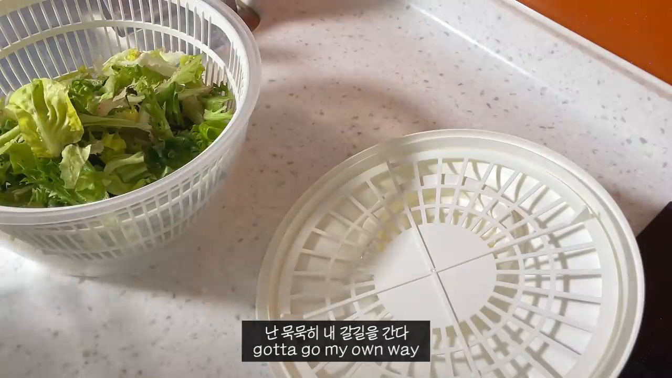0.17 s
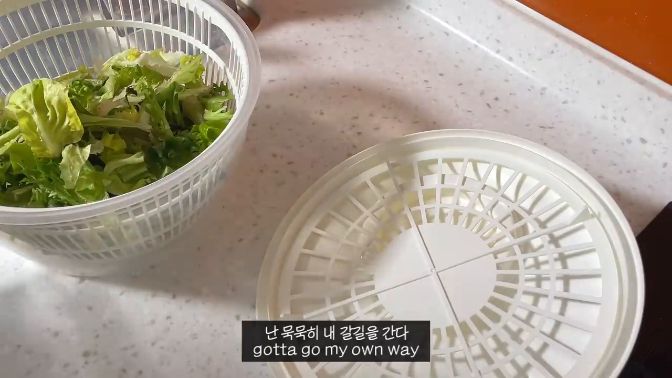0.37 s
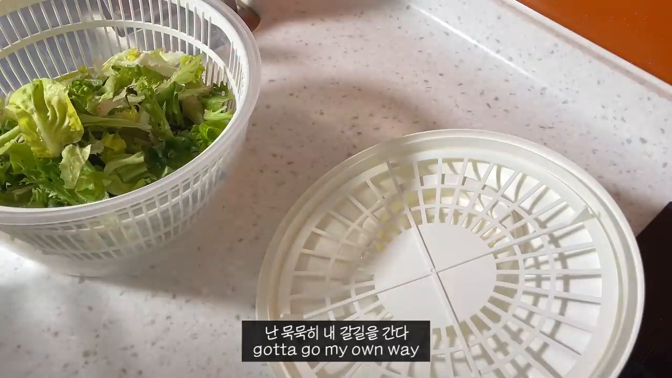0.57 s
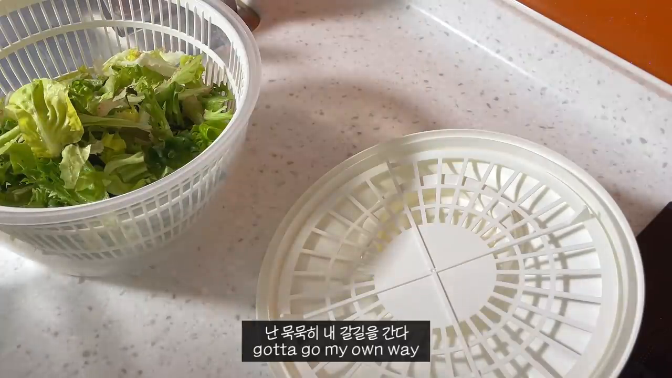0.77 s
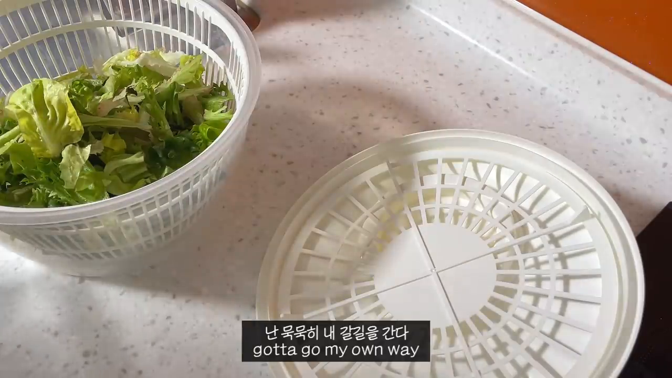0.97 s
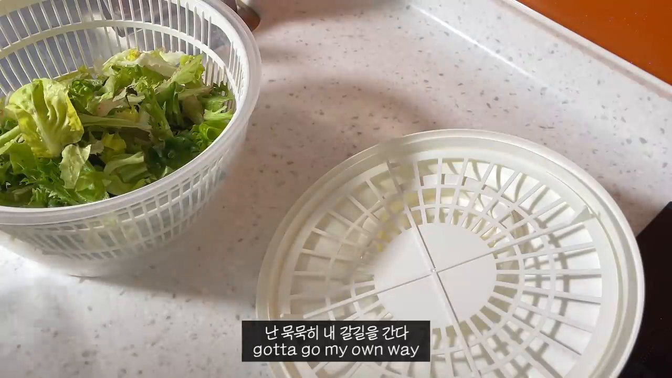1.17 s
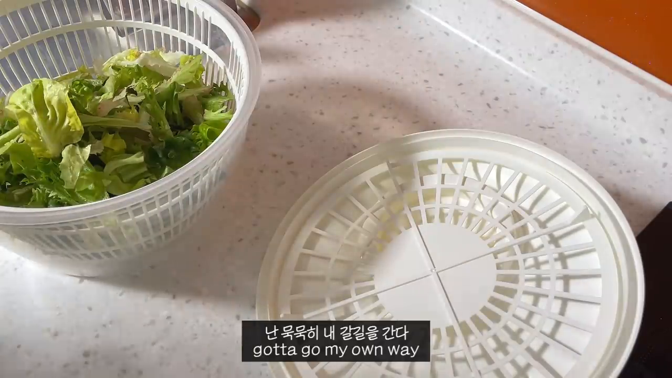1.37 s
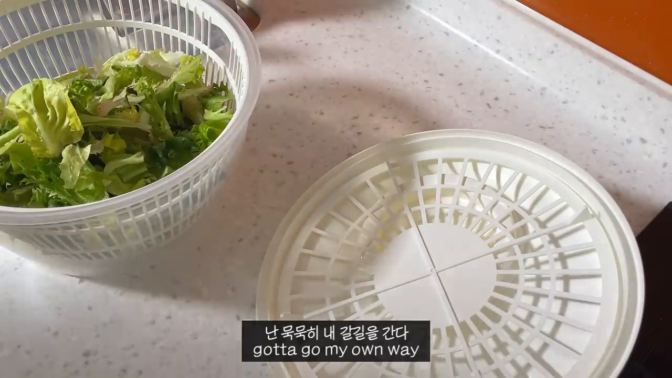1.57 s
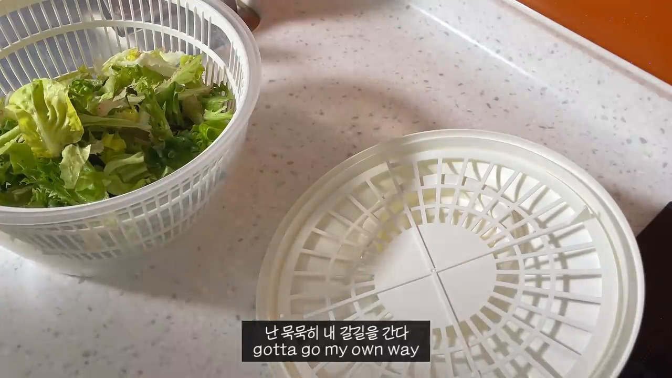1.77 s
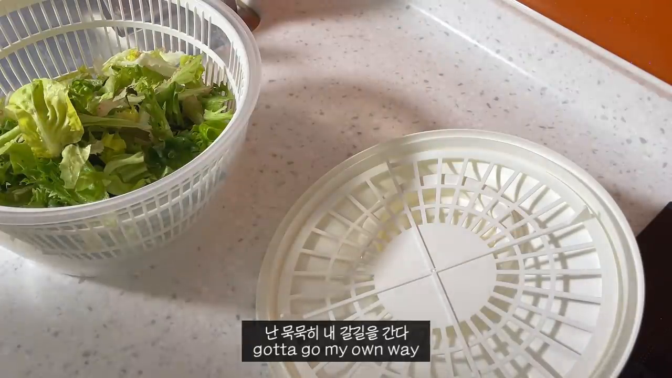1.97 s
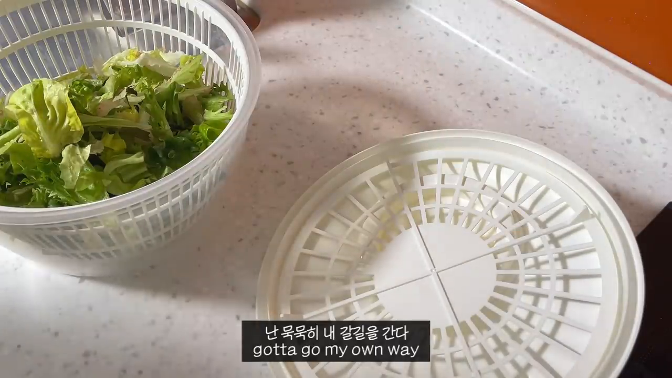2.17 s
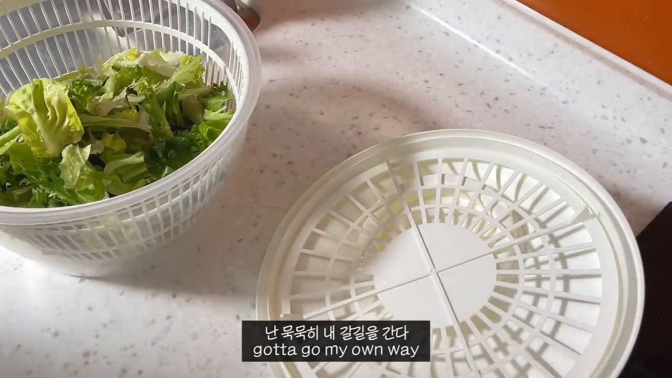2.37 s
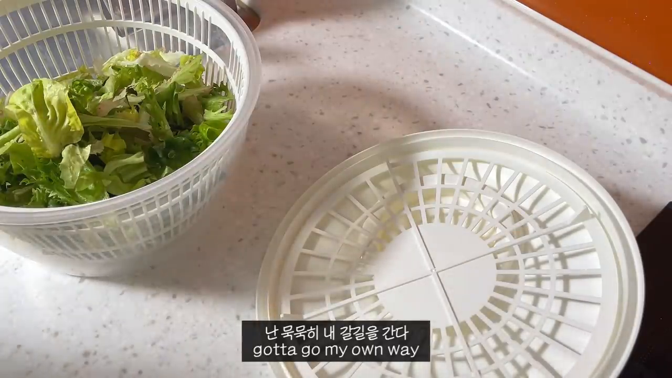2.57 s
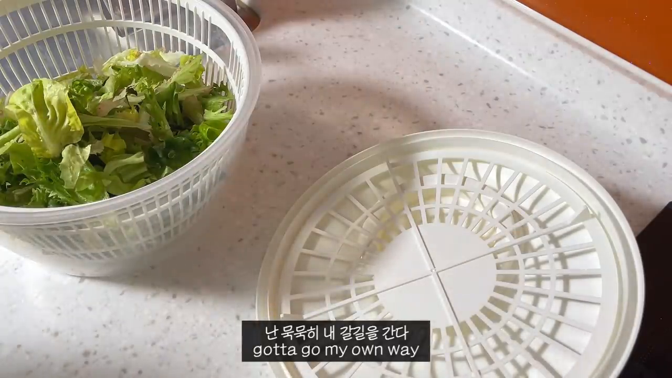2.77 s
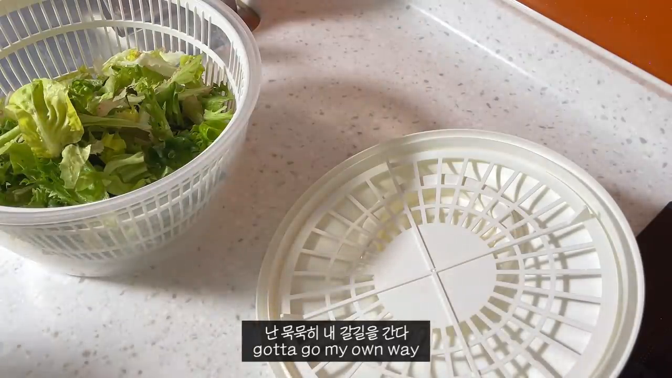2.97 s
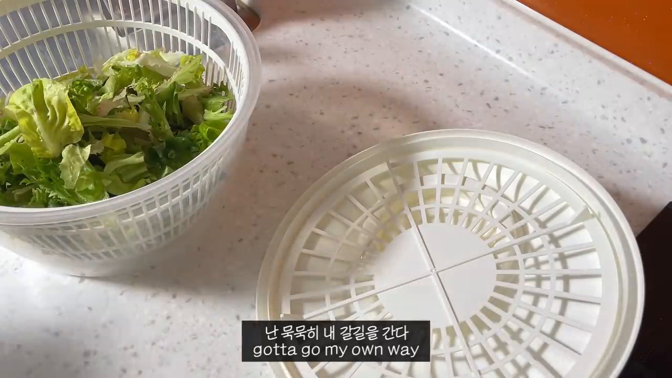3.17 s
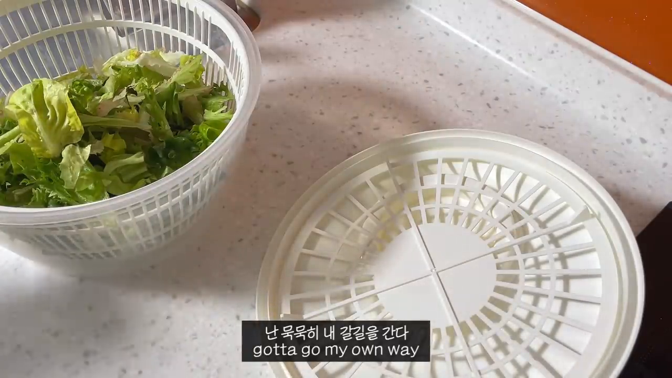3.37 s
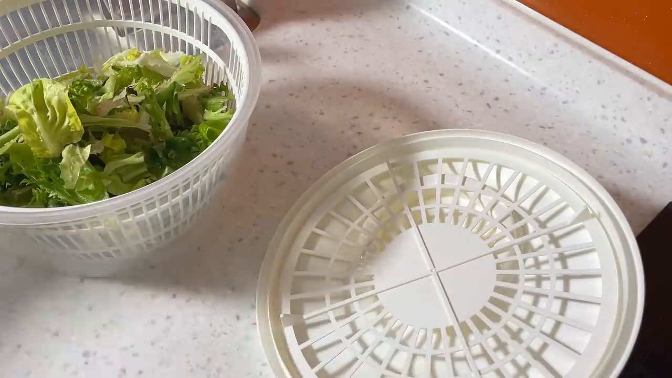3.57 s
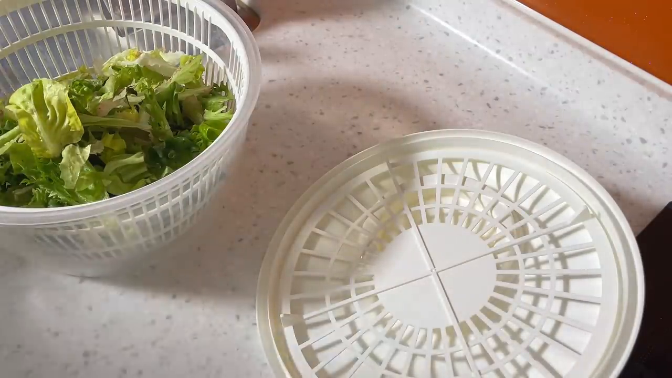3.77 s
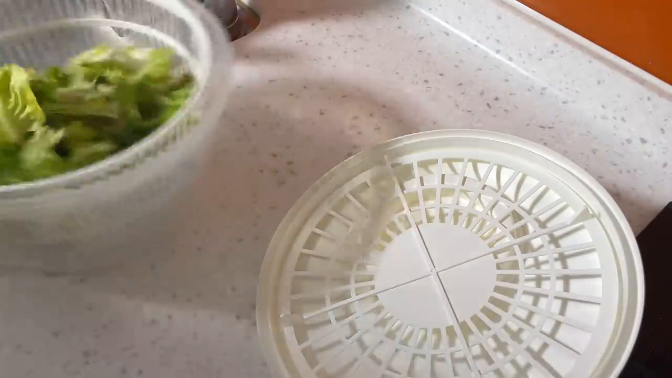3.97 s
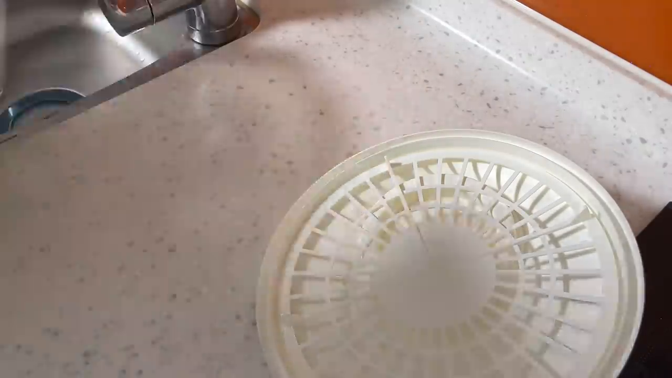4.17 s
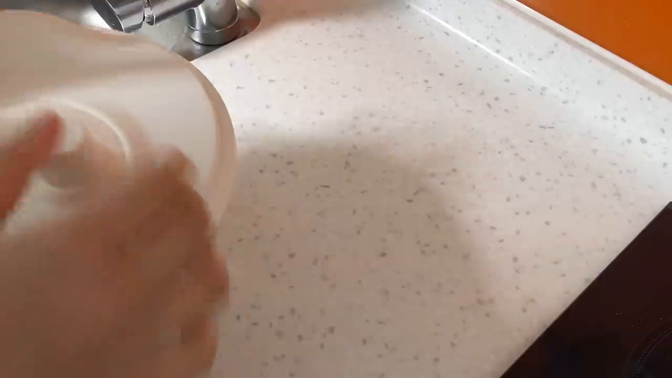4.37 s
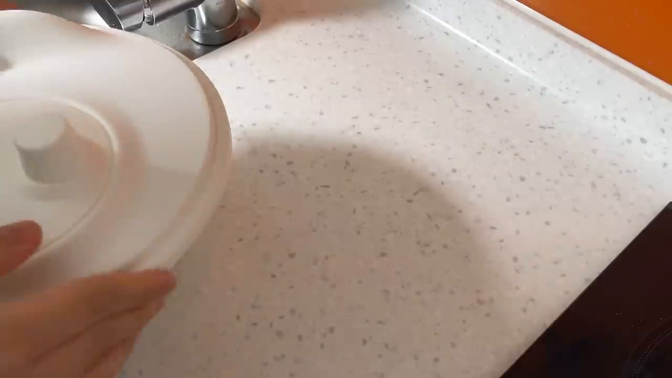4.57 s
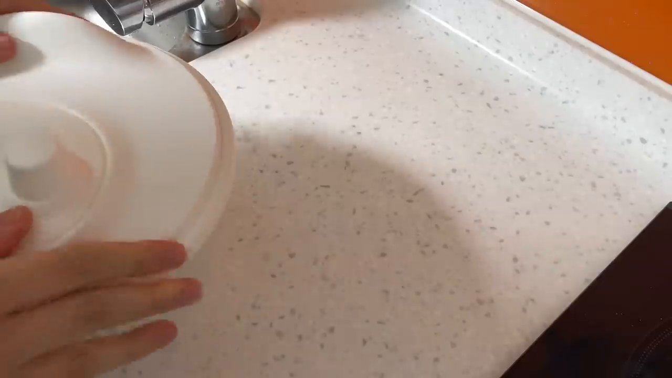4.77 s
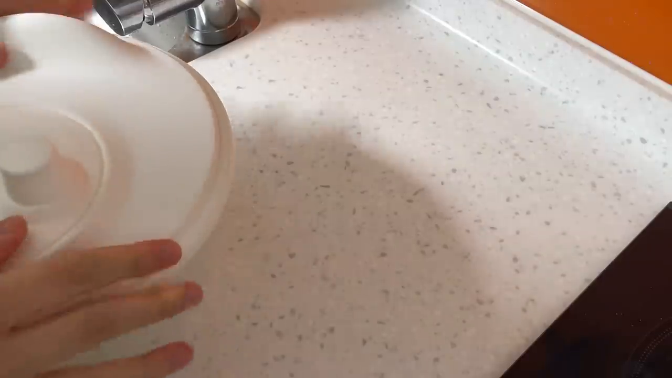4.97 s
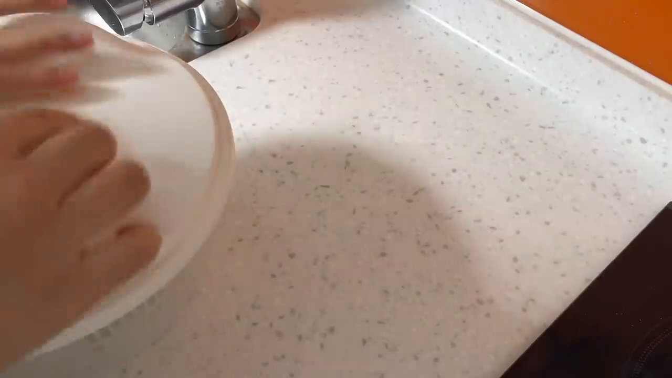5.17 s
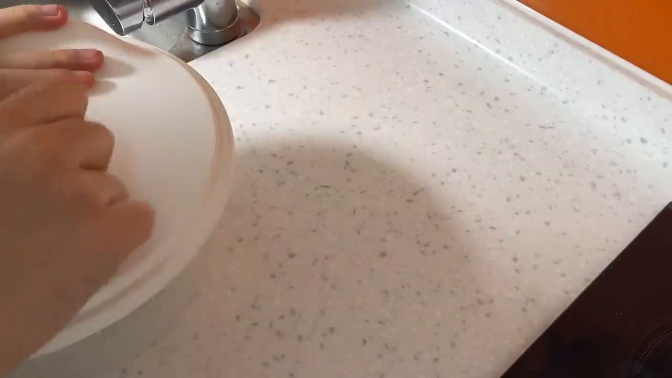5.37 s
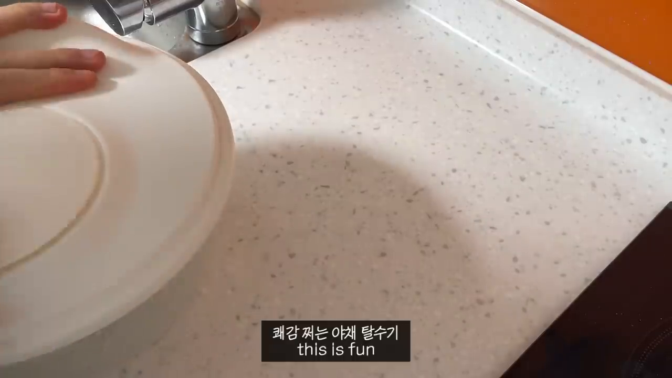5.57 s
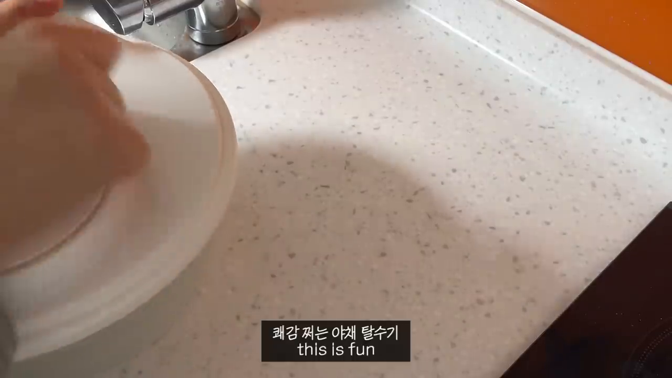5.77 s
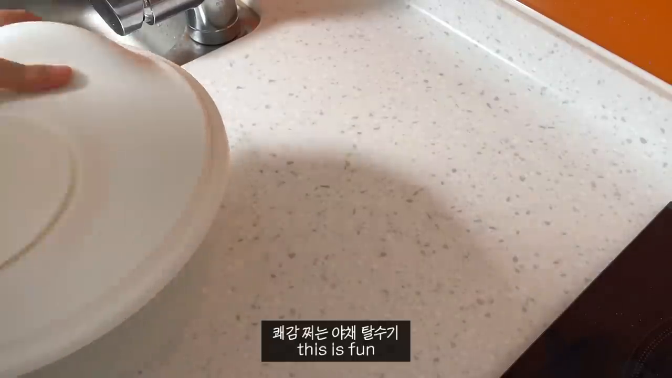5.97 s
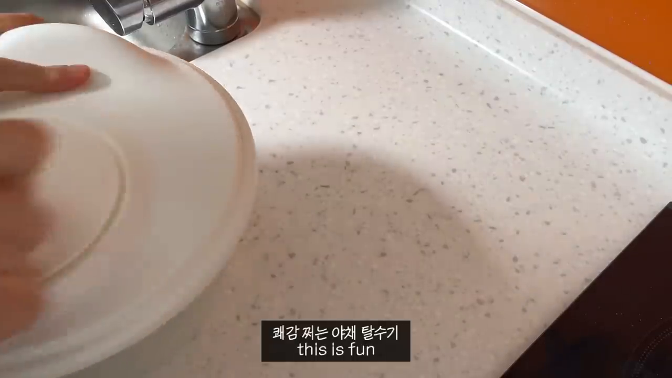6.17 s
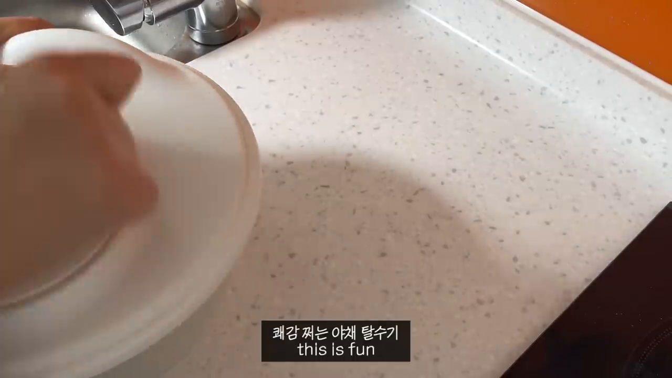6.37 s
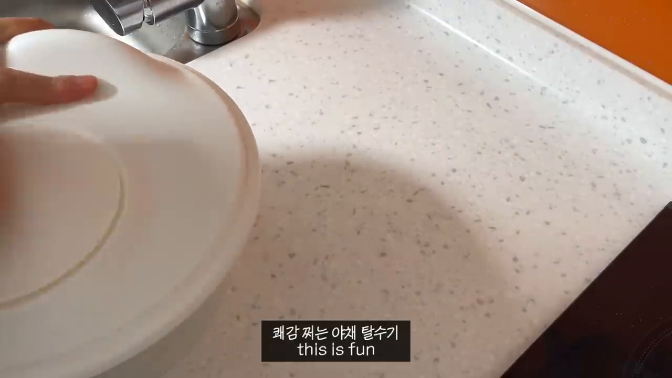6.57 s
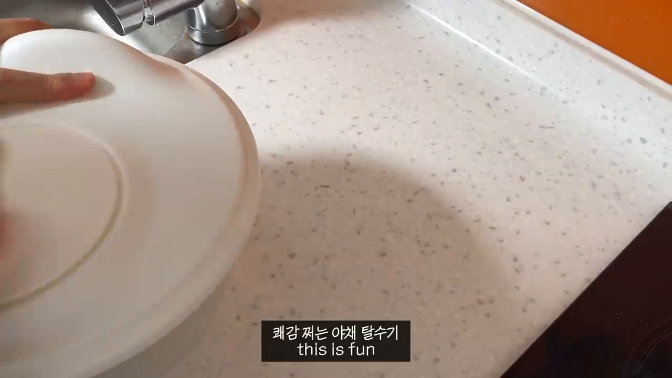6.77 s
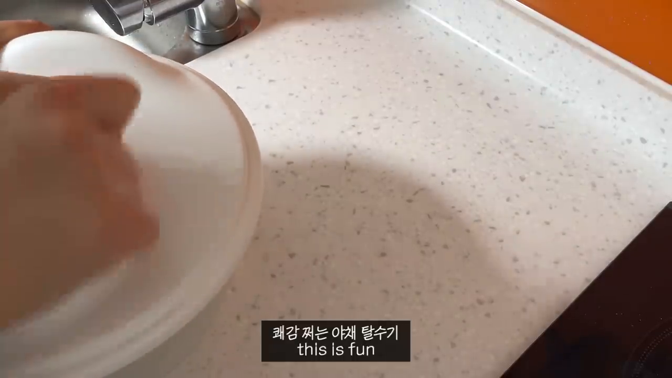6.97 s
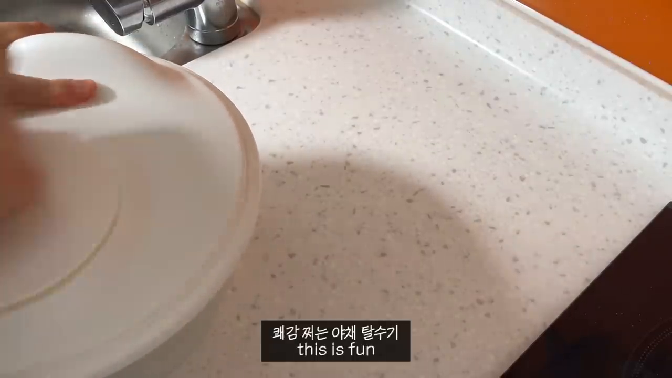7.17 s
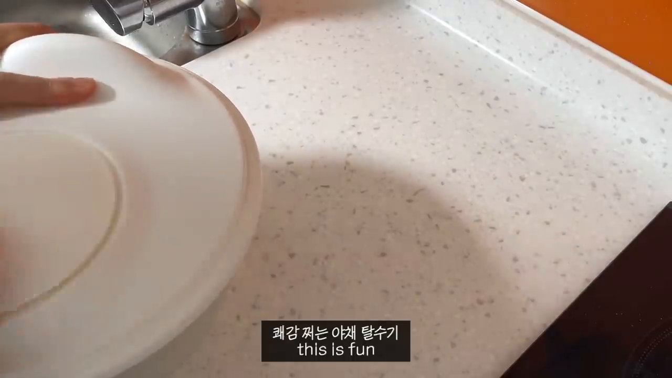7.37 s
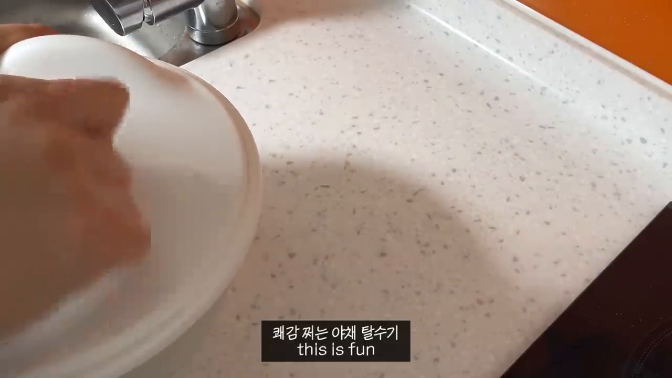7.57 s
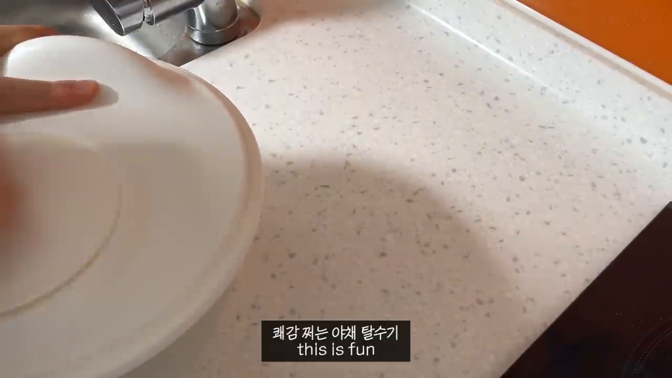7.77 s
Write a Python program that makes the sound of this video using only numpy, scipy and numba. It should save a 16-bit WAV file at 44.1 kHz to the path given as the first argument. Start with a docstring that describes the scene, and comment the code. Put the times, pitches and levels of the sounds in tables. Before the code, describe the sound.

Close up in a quiet home kitchen, light plastic bowl, basket and lid knock hollowly on a stone counter, with faint rustling, dull drags and one tiny squeak. After a sparse stretch, a cluster of lid clatters leads to hand cranking: a low rumbling start, then fast gear clicks and grinding that swell with each push, with quick hollow clacks per basket lap until the end. Short diffuse room tail, low soft air.

```python
"""Plastic salad spinner on a stone countertop in a quiet kitchen, close to a two-port microphone.
Knocks as bowl, basket and lid are set down: bowl modes, cracking wall noise, counter thuds.
Among them, shuffles of filtered grains and a short squeak of two gliding partials.
Then a hand cranks: clicks per gear tooth ring the lid, with grinding, rumble and a clack per lap.
Behind all: a diffuse room tail and low, wavering air noise."""
import sys
import numpy as np
from scipy import signal
from scipy.fft import rfft, irfft
from scipy.io import wavfile
from scipy.ndimage import uniform_filter1d
from numba import njit

SR = 44100
rng = np.random.default_rng(int(sys.argv[2]) if len(sys.argv) > 2 else 0)


def waveform_to_disk(signal):
    """Save audio, clipped to [-1, 1], as 16-bit WAV at the path in sys.argv[1]."""
    frames = np.transpose(np.atleast_2d(signal))
    scaled = np.clip(frames, -1, 1) * 32767
    samples = np.round(scaled).astype(np.int16)
    wavfile.write(sys.argv[1], SR, samples)


N = 348390
T = np.arange(N) / SR

# knocks of bowl, basket and lid:
# [t/s, blow gain/dB, strongest ring/Hz, thud gain/dB, crack gain/dB, chatter length/s]
KNOCK_EVENTS = [(0.068, -38.5, 700, -6, -19, .004), (0.151, -20.5, 474, -8, -5, 0.011),
                (0.218, -27.5, 487, -1.5, -9, 0.0051), (0.234, -25.5, 555, -12, -10, 0.0054),
                (0.269, -28, 460, -5, -9, .006), (0.351, -36, 550, -13, -13.5, 0.0058),
                (0.509, -15.5, 440, -12, -13, 0.008), (0.557, -29.5, 500, -5, -7.5, 0.0054),
                (0.682, -35.5, 417, -20, -17, 0.0068), (0.785, -33, 423, -16.5, -29, .006),
                (0.834, -9.5, 577, -18.5, -13, 0.013), (1.036, -16, 570, -23, -46, 0.0098),
                (1.118, -16.5, 634, -13, -43, 0.008), (1.431, -18, 397, -7, -45, 0.026),
                (1.8239, -8, 696, -16, -1, 0.011), (2.527, -39.5, 497, -15.5, -5.5, 0.0064),
                (2.983, -14, 517, -11, -19.5, 0.071), (3.154, -17.5, 525, -10.5, -16, 0.044),
                (3.858, -33, 689, -5, 3.5, 0.012), (4.231, -38.5, 340, -0.5, -13.5, 0.022),
                (4.311, -24, 2000, -15, -9, 0.0032), (4.343, -21.5, 510, -7, -11.5, 0.014),
                (4.371, -31.5, 500, 0, -10, .01), (4.482, -22, 520, -6, -5, 0.0093),
                (4.724, -13.5, 490, -12, -13.5, 0.0041), (4.744, -29, 1400, 1, -4.5, 0.0049),
                (4.762, -22.5, 1500, -6, -9.5, 0.0095), (4.776, -18.5, 580, -1.5, -1, 0.0094),
                (4.787, -17, 604, -5, -32, .03), (4.966, -35.5, 530, -8.5, -10.5, 0.0099),
                (5.162, -29, 790, -8.5, -16.5, 0.018), (5.26, -28.5, 900, -8, -6, 0.005),
                (5.305, -29, 775, -20, -29, .008), (6.046, -27, 343, 4.5, -24, 0.014)]
# rubbing of plastic and leaves: [t/s, length/s, strongest rustle gain/dB, drag over rustle/dB]
SHUFFLE_EVENTS = [(0, 0.14, -56, 12.5), (0.392, 0.13, -43, -1.5), (0.699, 0.12, -50, 9),
                  (1.055, 0.28, -55.5, 17), (1.311, 0.095, -49, 12), (1.431, 0.21, -61, 13),
                  (1.557, 0.12, -54.5, 14), (3.864, 0.17, -55.5, 1.5), (4.041, 0.043, -55, 3.5),
                  (4.256, 0.057, -30, -3.5), (4.454, 0.021, -49, 16), (4.573, 0.15, -45, 8),
                  (5.195, 0.14, -54.5, 18.5)]
# the hand pushes the handle once a turn and loads the gear: [t/s, length/s, load at start/dB, swell/dB]
HAND_PUSHES = [(5.36, 0.12, -48, 12), (5.486, 0.087, -33, -3), (5.816, 0.13, -32.5, 4.5),
               (6.055, 0.2, -31.5, 2.5), (6.36, .14, -33.5, 9), (6.681, 0.12, -28, -2.5),
               (6.985, 0.12, -27.5, -5), (7.292, 0.09, -27.5, -5), (7.565, 0.14, -30, 1.5)]


def undb(db):
    """Decibels to gain."""
    return 10 ** (np.asarray(db) / 20)


def unit(x):
    """Scale to rms 1."""
    return x / np.sqrt(np.mean(x ** 2))


def colour(x, table):
    """Filter by an [f/Hz, level/dB] table, with a causal response from the cepstrum."""
    hz, db = np.transpose(table)
    grid_hz = np.linspace(1, SR / 2, 2049)
    cepstrum = irfft(np.interp(np.log(grid_hz), np.log(hz), db) * np.log(10) / 20)
    # fold onto positive time: minimum phase
    cepstrum[1:2048] *= 2
    cepstrum[2049:] = 0
    return signal.fftconvolve(x, irfft(np.exp(rfft(cepstrum))))[:len(x)]


@njit
def svf(x, hz, width):
    """State-variable band-pass whose centre may move, gain 1 at the centre."""
    y, band, low = np.empty(len(x)), 0., 0.
    for i in range(len(x)):
        g, k = np.tan(np.pi * hz[i] / SR), width / hz[i]
        v = (band + g * (x[i] + 1e-18 - low)) / (1 + g * (g + k))
        band, low, y[i] = 2 * v - band, low + 2 * g * v, k * v
    return y


def resonate(x, table):
    """Sum of fixed [f/Hz, width/Hz, level/dB] resonances."""
    return sum(undb(db) * svf(x, np.full(N, float(hz)), float(width)) for hz, width, db in table)


def walk(rate_hz):
    """Random levels held 1 / rate_hz and slewed; spread near 1."""
    hold = int(SR / rate_hz)
    steps = np.repeat(rng.standard_normal(N // hold + 1), hold)
    return 2 ** .5 * uniform_filter1d(steps, hold)[:N]


def grains(per_s, spread_db):
    """Scattered clicks, a few much larger than the rest, over a bed of noise."""
    hit = rng.random(N) < per_s / SR
    clicks = hit * rng.standard_normal(N) * undb(spread_db * rng.exponential(size=N))
    return unit(clicks + 0.22 * rng.standard_normal(N))


def ring(t, hz, t60_s):
    """One decaying mode."""
    return np.sin(2 * np.pi * hz * t) * np.exp(-np.log(1000) * t / t60_s)


def strokes(table, edge_s, release_s):
    """Gain of [t/s, length/s, start/dB, end/dB] strokes, soft-edged, 30 dB release; the strongest counts."""
    gains = []
    for s, length_s, start_db, end_db in table:
        times_s = (s, s + length_s, s + length_s + release_s)
        gains.append(undb(np.interp(T, times_s, (start_db, end_db, end_db - 30), -200, -200)))
    return uniform_filter1d(np.max(gains, axis=0), int(edge_s * SR))


def knocks():
    """Each knock chatters: its contacts ring the bowl and crack in its wall; a thud joins from the counter."""
    out, t = np.zeros(N + SR), T[:SR // 3]
    for s, db, hz, thud_db, crack_db, length_s in KNOCK_EVENTS:
        touch = chatter(length_s)
        blow = hollow_ring(touch, t, hz)
        blow = blow + undb(crack_db) * wall_crack(touch, t)
        blow = blow + undb(thud_db) * counter_thud(t, s)
        i = int(s * SR)
        out[i:i + len(t)] += undb(db) * blow
    return out[:N]


def chatter(length_s):
    """Contact impulses at jittered intervals, the first at once, weakening along the chatter."""
    contacts = 10
    jitter, force = rng.random((2, contacts))
    order = np.arange(contacts)
    when = (order + jitter * (order > 0)) / contacts  # fraction of the chatter
    touch = np.zeros(SR // 10)
    strength = np.where(when > 0, .4 + force, 1.1) * np.exp(-1.1 * when)
    np.add.at(touch, (when * length_s * SR).astype(int), strength)
    return touch


def hollow_ring(touch, t, strongest_hz):
    """Contacts of random sign excite detuned bowl modes, weaker away from the strongest; peak 1."""
    # bowl modes: [f/Hz]
    bowl_modes = [360, 470, 532, 620, 870, 1178, 1490, 1940]
    off_db_per_octave, ring_cycles = 12, 23  # cycles to fall 60 dB
    modes = 0
    for hz in bowl_modes:
        gain = undb(-off_db_per_octave * abs(np.log2(hz / strongest_hz)))
        detuned_hz = hz * (1 + 0.04474 * rng.standard_normal())
        modes = modes + gain * ring(t, detuned_hz, ring_cycles / hz)
    hollow = signal.fftconvolve(touch * rng.choice([-1, 1], len(touch)), modes)[:len(t)]
    return hollow / np.abs(hollow).max()


def wall_crack(touch, t):
    """The ribbed wall has too many modes to tell apart: noise in a burst and a rough tail."""
    # wall noise spectrum: [f/Hz, density/dB per Hz]
    wall_spectrum = [(410, -34.5), (700, -2.5), (5880, -21), (10800, -27.5), (14100, -41.5)]
    decay = np.exp(-t / 0.0023) + 0.074 * np.exp(-t / 0.031)
    burst = signal.fftconvolve(touch, decay)[:len(t)]
    return unit(colour(rng.standard_normal(len(t)), wall_spectrum)) * burst / burst.max()


def counter_thud(t, s):
    """Soft-onset counter modes, scattered in level and pitch; thuds sit higher once the lid is on."""
    # counter modes: [f/Hz, level/dB, t60/s]
    counter_modes = [(98.8, 3.5, 0.33), (165.7, -2, 0.24), (235.6, -8.5, 0.12)]
    # change with the lid on, per counter mode: [level/dB]
    lid_change = (-11, 4.5, 9.5)
    lid_on_s = 4.2
    thud = 0
    for (hz, db, t60_s), lid_db in zip(counter_modes, lid_change):
        level_db = db + (s > lid_on_s) * lid_db + 0.73 * rng.standard_normal()
        thud = thud + undb(level_db) * ring(t, hz * (1 + .04 * rng.standard_normal()), t60_s)
    return thud * (1 - np.exp(-t / 0.0062))


def shuffle():
    """Dry rustle of ribs and leaves, and under it the dull drag of the bowl over the counter."""
    # rustle spectrum: [f/Hz, density/dB per Hz]
    rustle_spectrum = [(350, -32.5), (600, 7.5), (814, -13), (10700, -28.5), (15400, -45.5)]
    # ribs that sing as they are rubbed: [f/Hz]
    rib_modes = (2450, 3400)
    rib_width_hz, rib_db, settle_s = 450., -8, 0.06
    rub = grains(2000, 1.6)
    ribs = sum(svf(rub, hz * (1 + .1 * walk(20)), rib_width_hz) * undb(5 * walk(30)) for hz in rib_modes)
    rustle = unit(colour(rub, rustle_spectrum)) + undb(rib_db) * unit(ribs)
    rustle = rustle * undb(2.5 * walk(50))
    drag = unit(resonate(grains(500, 1.2), [(130.0, 14, 19.0), (306.7, 140, 5.4)]))
    drag = drag * undb(2 * walk(40))
    light = slides()
    heavy = light.copy()
    heavy[:, 2:] += np.array(SHUFFLE_EVENTS)[:, -1:]
    return strokes(light, 0.0099, settle_s) * rustle + strokes(heavy, 0.0098, 2 * settle_s) * drag


def slides():
    """Shuffles as strokes: each dies away, unless it ends in a knock: then it grows toward it."""
    fade_db, grow_db, knock_near_s = 14, 25, .015
    knock_s = np.array(KNOCK_EVENTS)[:, 0]
    table = []
    for s, length_s, db, _ in SHUFFLE_EVENTS:
        if np.abs(knock_s - s - length_s).min() < knock_near_s:
            table.append((s, length_s, db - grow_db, db))
        else:
            table.append((s, length_s, db, db - fade_db))
    return np.array(table)


def squeak():
    """Rubbed soft plastic: a brief swell and fade, pitch rising into the peak, upper partial rougher."""
    # squeak partials: [f/Hz, level/dB]
    partials = [(590, -23), (2650, -42)]
    peak_s, swell_s = 1.577, .007
    t = T - peak_s
    swell = np.exp(-np.where(t < 0, (t / swell_s) ** 2, t / (1.3 * swell_s)))
    glide = t + 8 * t * np.clip(t, -.04, 0)  # warped time
    tones = 0
    for hz, db in partials:
        rough = 1 + hz / 2000 * walk(700)
        tones = tones + undb(db) * rough * np.sin(2 * np.pi * hz * glide)
    return swell * tones


def crank():
    """Gear teeth click and grind under load; unloaded they only grind; the spinning basket rumbles."""
    # cranking: [t/s, mean tooth rate/Hz, rumble before load gain/dB]
    crank_course = [(5.36, 71, -17.5), (5.55, 87.66, -36), (5.8, 138.5, -39.5), (6.1, 153.6, -39.5),
                    (6.301, 160, -35), (7.9, 143.1, -37)]
    idle_db = -48
    s, rate_hz, rumble_db = np.transpose(crank_course)
    load = gear_load()
    spin = np.clip((T - s[0]) / 0.26, 0, 1) ** 2
    turns = np.cumsum(np.interp(T, s, rate_hz) * (1 + .015 * walk(40))) / SR  # in teeth
    tooth, phase = turns.astype(int), turns % 1
    tooth_scatter_db = 2.3
    size = undb(tooth_scatter_db * rng.standard_normal(tooth[-1] + 1))[tooth]
    clicks = tooth_clicks((np.diff(tooth, prepend=0) > 0) * size)
    grind = tooth_grind(size, phase)
    rumble = basket_rumble(np.interp(T, s, rumble_db))
    bite = load * (.9 * unit(clicks) + .24 * grind)
    return bite + undb(idle_db) * spin * grind + rumble * spin * (0.87 + 8 * load)


def tooth_clicks(pulses):
    """Each tooth rings lid modes; wobble varies them; the lid stiffens in a push, favouring higher ones."""
    # lid modes: [f/Hz, level as a push sets in/dB, level late in the push/dB]
    lid_modes = [(855, -3, -8.5), (1180, 6, -9), (1520, 0, 2.5), (1903, -2, 3.5), (2380, -6, -5.5)]
    mode_width_hz, mode_wander_db = 450, 3.3
    starts_s = np.array(HAND_PUSHES)[:, 0]
    since_s = T - starts_s[np.maximum(np.searchsorted(starts_s, T) - 1, 0)]
    late = np.where(since_s < .2, np.clip(since_s / .13, 0, 1), .3)  # part way back after 0.2 s
    clicks = 0
    for hz, early_db, late_db in lid_modes:
        mode = [(hz, mode_width_hz, 0)]
        level_db = early_db + (late_db - early_db) * late + mode_wander_db * walk(45)
        struck = pulses * undb(level_db)
        clicks = clicks + rng.choice([-1, 1]) * resonate(resonate(struck, mode), mode)
    return clicks


def tooth_grind(size, phase):
    """Grit that swells at each tooth and decays until the next, coloured and resonated by the lid."""
    # grinding spectrum: [f/Hz, density/dB per Hz]
    grind_spectrum = [(300, -6), (2000, -2), (2740, -9.5), (7630, -21.5), (12200, -36.5), (15200, -23)]
    # lid resonances: [f/Hz, width/Hz, level/dB]
    lid_resonances = [(571, 134, 22.5), (3340, 265, 15)]
    grit = grains(3000, 1.8) * (.4 + size * np.exp(-phase / .25))
    return 2.17 * unit(colour(grit, grind_spectrum)) + 1.08 * unit(resonate(grit, lid_resonances))


def basket_rumble(level_db):
    """Grains through low resonances, deep bass cut, level wandering."""
    # rumble resonances: [f/Hz, width/Hz, level/dB]
    rumble_modes = [(106, 80, -10.5), (156.7, 43, -7), (224.2, 5.4, -2)]
    rumble = colour(resonate(grains(800, 1.4), rumble_modes), [(30, -31), (90, -7)])
    return unit(rumble) * undb(level_db + 2.04 * walk(15))


def gear_load():
    """Load on the gear: pushes build up gently; each lap adds a short, sudden catch; the larger counts."""
    rise_s, unload_s = 0.016, 0.0028
    catch_s, catch_db, catch_fade_db = 0.038, -31, 10.5
    pushes = [(s + rise_s / 2, length_s - rise_s / 2, db, db + swell_db)
              for s, length_s, db, swell_db in HAND_PUSHES]
    catches = [(s, catch_s, catch_db, catch_db - catch_fade_db) for s in laps()]
    return np.maximum(strokes(pushes, rise_s, unload_s), strokes(catches, 0.0029, unload_s))


def laps():
    """Moments at which the heavy side of the lopsided basket comes round, one per lap."""
    # basket rotation: [t/s, laps turned]
    basket_turns = [(5.742, 0), (5.982, 3), (6.289, 7), (6.909, 15), (7.152, 18), (7.474, 22), (7.724, 25),
                    (7.806, 26)]
    s, turned = np.transpose(basket_turns)
    return np.interp(np.arange(turned[-1] + 1), turned, s)


def clacks():
    """Once a lap the basket clacks against the lid: a hollow pair of modes, quieter as a push starts."""
    clack_db = -17.5
    near_push_s, near_push_db = 0.017, -9.5  # clacks close to the start of a push are quieter
    out, t = np.zeros(N + SR), T[:SR // 10]
    push_s = np.array(HAND_PUSHES)[:, 0]
    for s in laps():
        scatter_db, detune_low, detune_high = rng.standard_normal(3)
        nearness = np.exp(-(np.abs(push_s - s).min() / near_push_s) ** 2)
        hollow = ring(t, 530 * (1 + 0.048 * detune_low), 0.04)
        hollow = hollow + 0.57 * ring(t, 650 * (1 + 0.043 * detune_high), 0.029)
        gain = undb(clack_db + near_push_db * nearness + scatter_db)
        i = int(s * SR)
        out[i:i + len(t)] += gain * hollow * (1 - np.exp(-t / 0.0019))
    return out[:N]


def room(x):
    """Diffuse kitchen tail, the treble dying first; it is thin below about 220 Hz."""
    t60_s, treble_t60_s, room_db = 0.33, 0.089, -5
    t = T[:SR // 2]
    bass_cut = signal.butter(2, 220, "high", fs=SR, output="sos")
    noise = signal.sosfilt(bass_cut, rng.standard_normal((4, len(t))))
    low = uniform_filter1d(noise, size=40)
    tails = 0.8 * low * np.exp(-np.log(1000) * t / t60_s)
    tails = tails + (noise - low) * np.exp(-np.log(1000) * t / treble_t60_s)
    tails = unit(tails * (1 - np.exp(-t / 0.0011))) / np.sqrt(len(t))
    # the tail blends steadily between two diffuse stereo patterns, three turns a second
    turn = 2 * np.pi * 3 * T
    wet = 0
    for weight, pair in ((np.cos(turn), tails[:2]), (np.sin(turn), tails[2:])):
        wet = wet + signal.fftconvolve((x * weight)[None], pair)[:, :N]
    return undb(room_db) * wet


def hush():
    """The low, wavering air of the kitchen: coloured noise, partly different in each channel."""
    # air spectrum: [f/Hz, level/dB]
    air_spectrum = [(30, 2), (60, 8.5), (223, -16.5), (6550, -46)]
    hush_db = -61.5
    mid, side = [colour(rng.standard_normal(N), air_spectrum) for _ in range(2)]
    air = unit(mid + 0.24 * side * np.array([[1], [-1]]))
    return air * undb(hush_db + 0.46 * walk(9.3))


def scene():
    """All sources near the microphone, panned together, with their room tail and the air."""
    # where the hands work: [t/s, left minus right/dB]
    hand_place = [(1.4, -0.5), (2.9, -6.5), (4.0, -2.5), (5.2, -1)]
    near = knocks() + squeak() + shuffle() + crank() + clacks()
    pan_db = np.interp(T, *np.transpose(hand_place))
    return near * undb(np.array([pan_db, -pan_db]) / 2) + room(near) + hush()


def record(dry):
    """Two ports hear the sound out of phase, most in the top treble; bass cut, peaks rounded, top cut."""
    # quadrature side signal of the ports: [f/Hz, side minus mid/dB]
    port_side = [(200, -24), (700, -6), (4400, -10), (9000, 2)]
    mid, side = (dry[0] + dry[1]) / 2, (dry[0] - dry[1]) / 2
    hz, db = np.transpose(port_side)
    gain = undb(np.interp(np.log(np.fft.rfftfreq(N, 1 / SR) + 1), np.log(hz), db))
    side = side + irfft(1j * gain * rfft(mid), N)
    bass_cut = signal.butter(3, 50, "high", fs=SR, output="sos")
    both = signal.sosfilt(bass_cut, np.array([mid + side, mid - side]))
    top_cut = signal.ellip(10, .2, 80, 16000, fs=SR, output="sos")
    return signal.sosfilt(top_cut, np.tanh(both))


dry = scene()
out = record(dry)
waveform_to_disk(out)
```